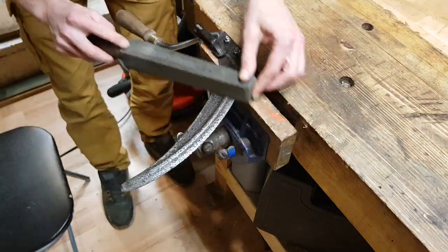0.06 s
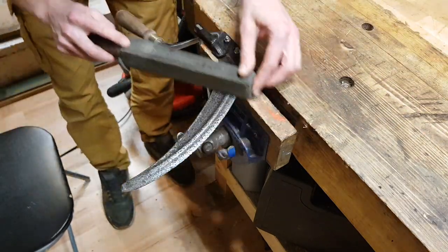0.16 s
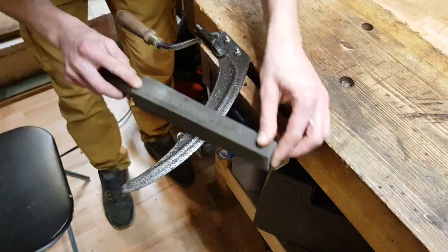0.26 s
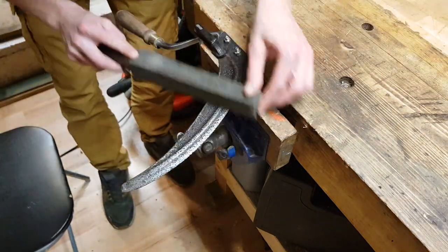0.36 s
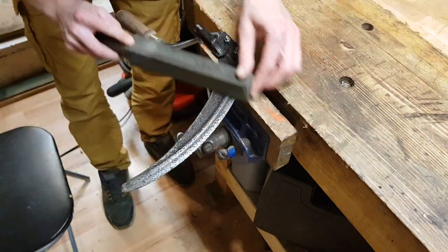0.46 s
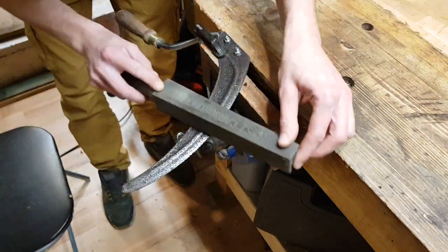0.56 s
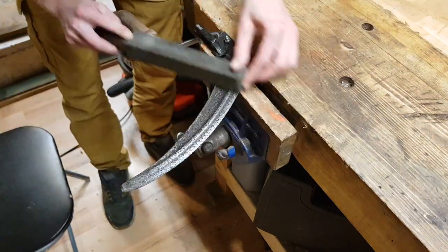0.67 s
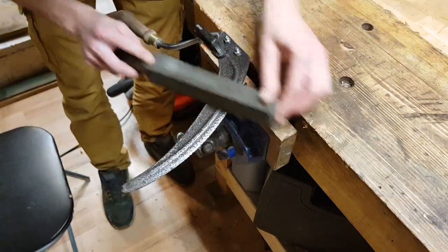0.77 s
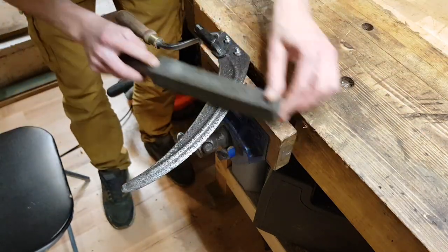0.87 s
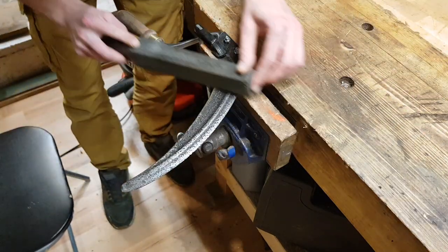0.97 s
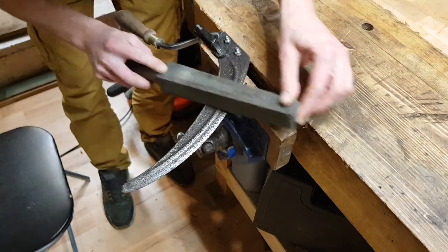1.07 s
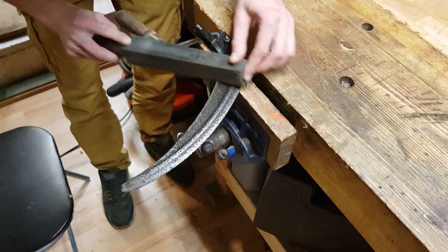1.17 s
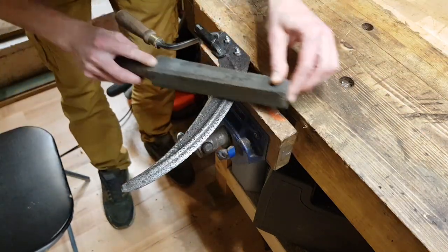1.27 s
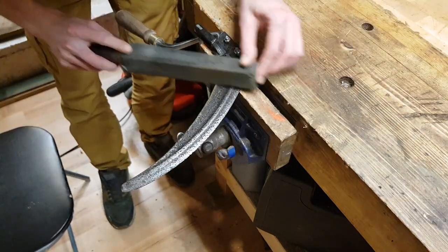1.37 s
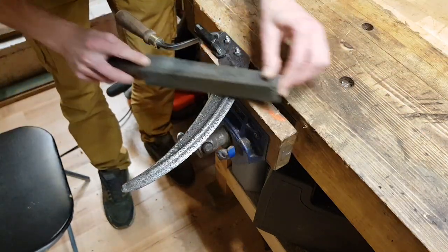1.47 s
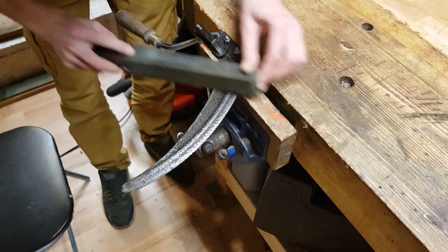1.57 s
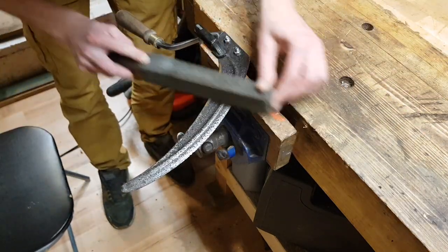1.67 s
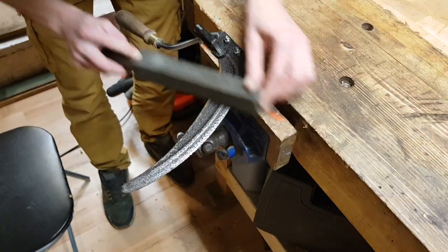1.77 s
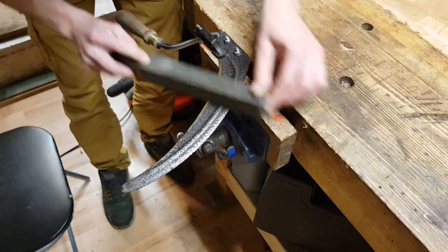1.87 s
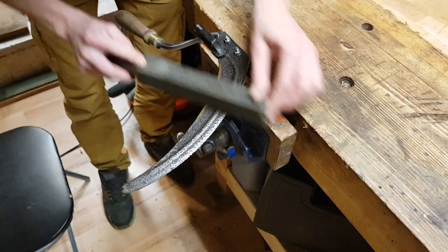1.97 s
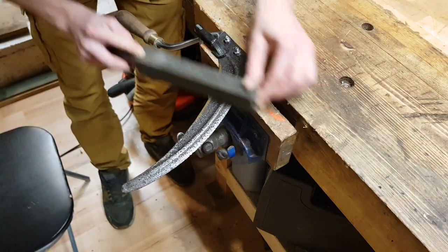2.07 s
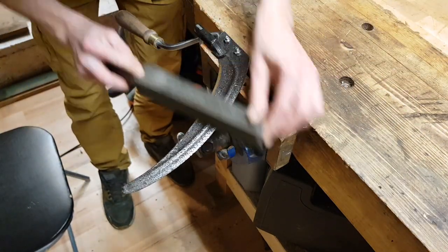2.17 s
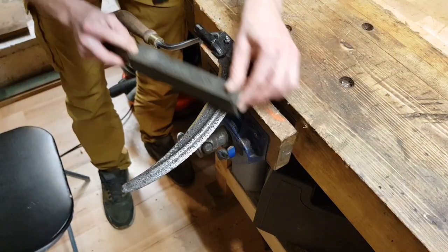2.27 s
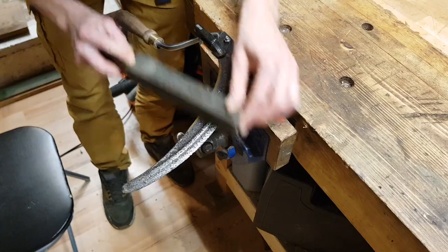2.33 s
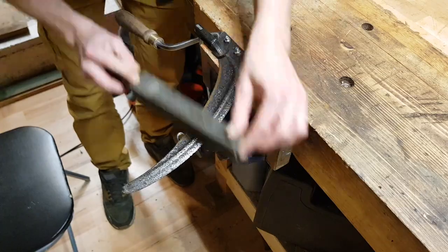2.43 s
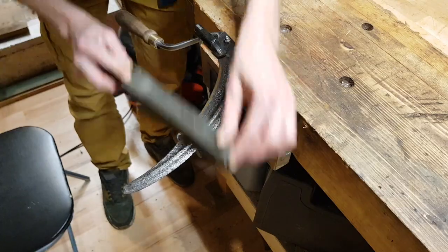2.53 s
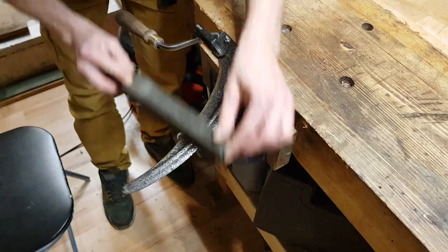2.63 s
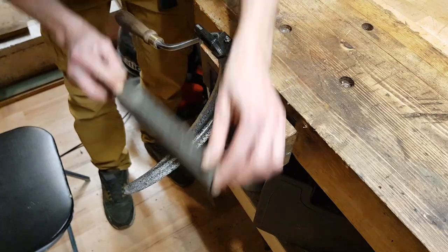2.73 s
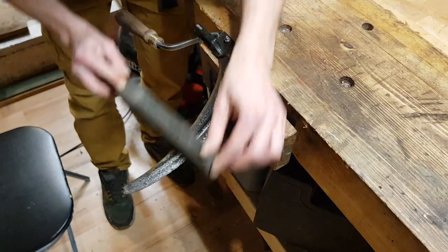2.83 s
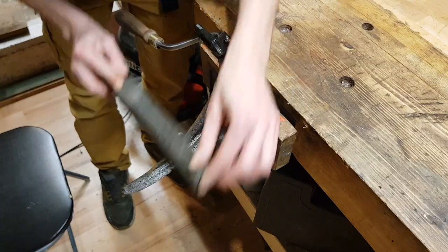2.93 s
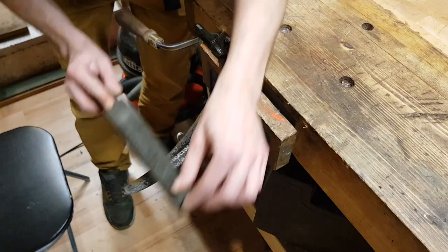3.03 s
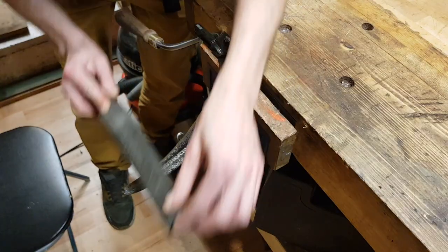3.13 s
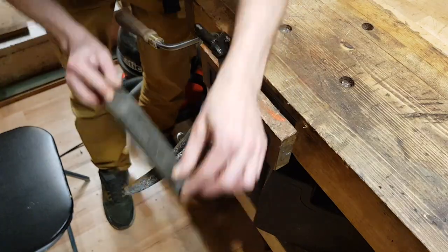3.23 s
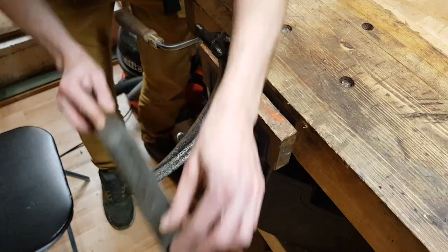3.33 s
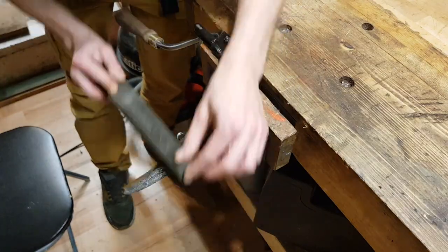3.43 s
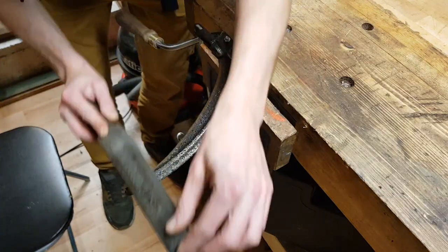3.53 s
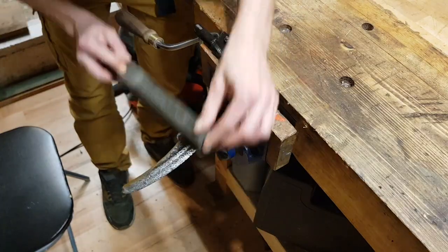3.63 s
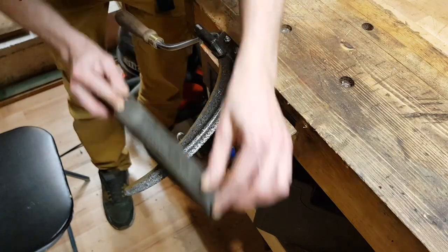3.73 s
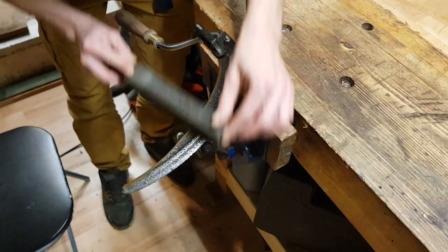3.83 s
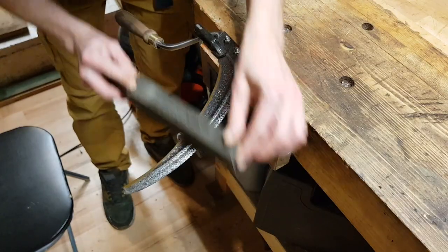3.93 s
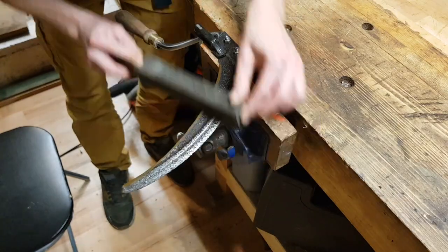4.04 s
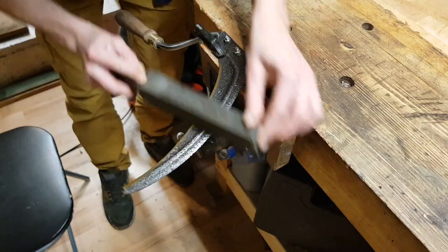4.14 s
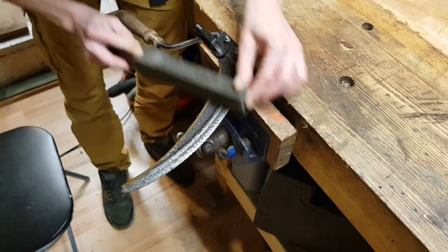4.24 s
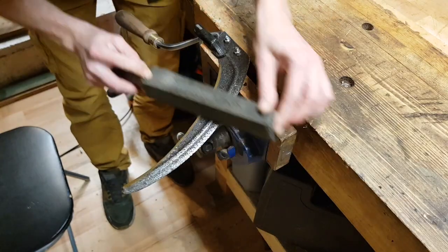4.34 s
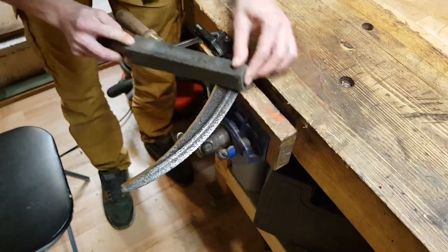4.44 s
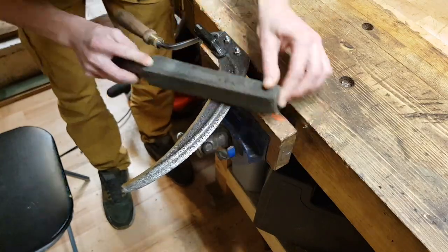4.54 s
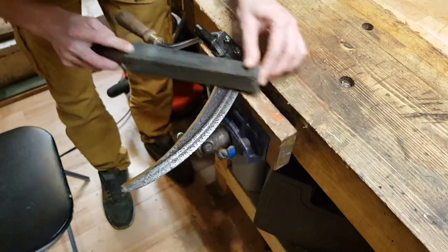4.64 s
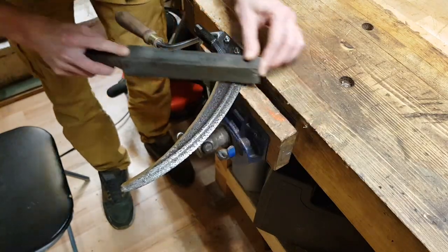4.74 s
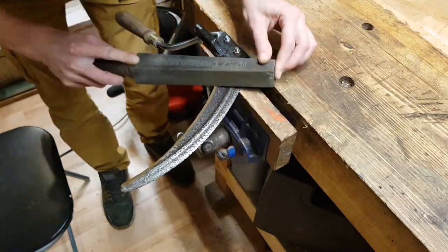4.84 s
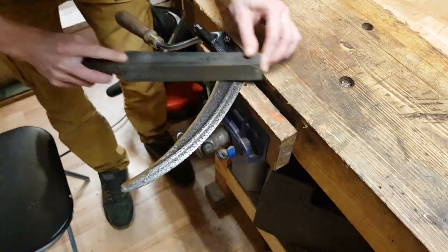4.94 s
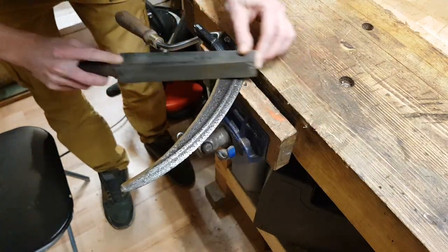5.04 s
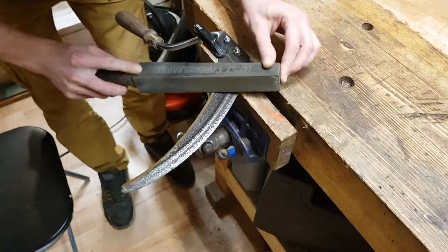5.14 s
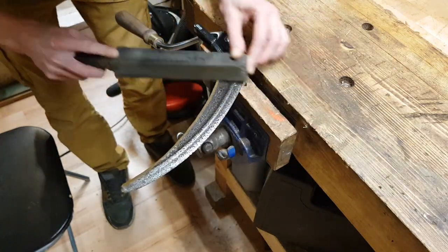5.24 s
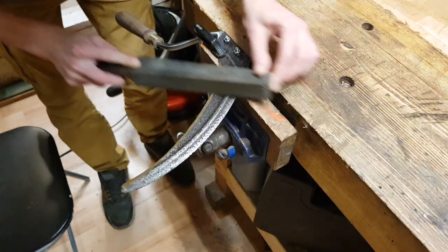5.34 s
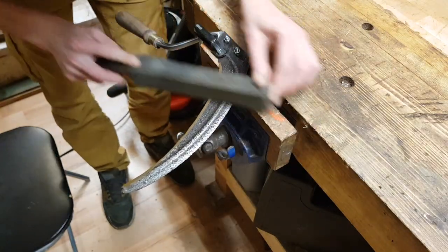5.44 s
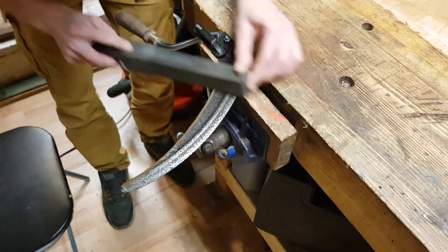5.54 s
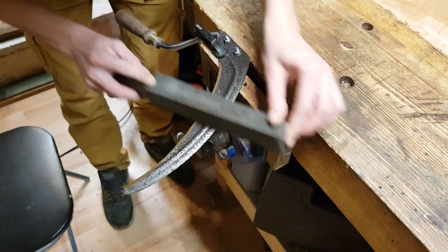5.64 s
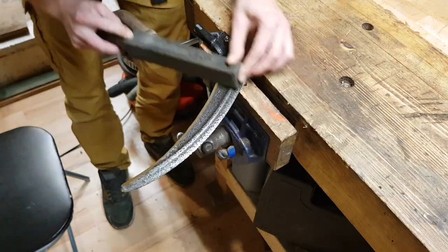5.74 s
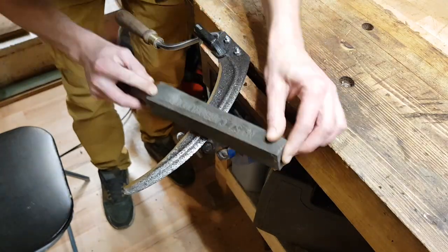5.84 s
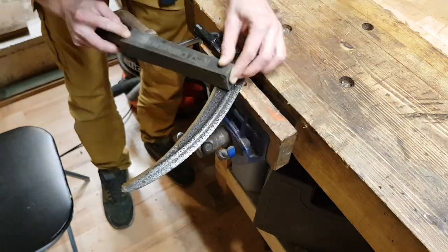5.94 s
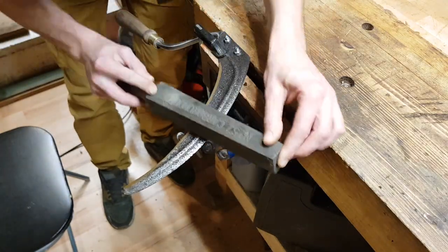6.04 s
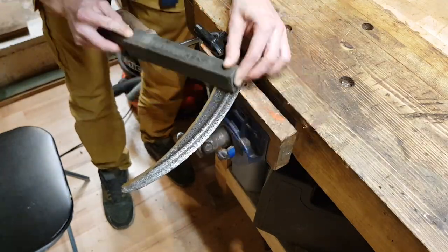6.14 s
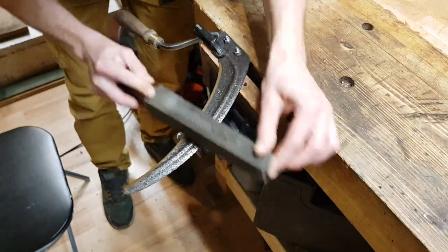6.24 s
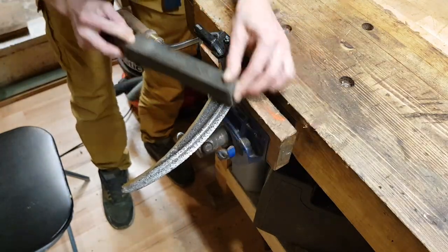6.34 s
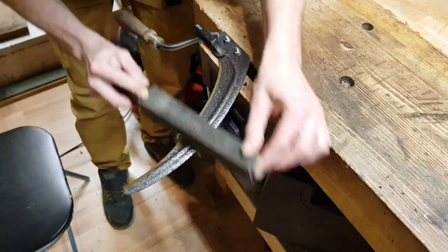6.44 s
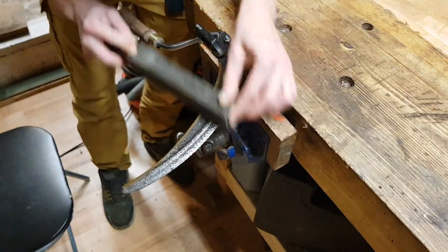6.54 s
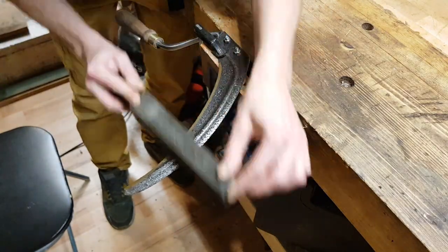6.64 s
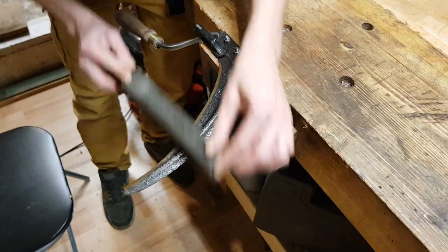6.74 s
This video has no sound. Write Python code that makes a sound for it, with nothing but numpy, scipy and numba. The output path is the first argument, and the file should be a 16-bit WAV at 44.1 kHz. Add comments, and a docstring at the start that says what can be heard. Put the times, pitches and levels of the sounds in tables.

```python
"""Sharpening stone on a curved blade

A long stone rubs to and fro, ten strokes a second, on a curved steel blade clamped to a wooden bench.
Breaking grit is noise grains shaped into a bright rasp that stops at every turn; the same kind of grains
drive fixed blade modes, modes that glide as the contact travels, and bench modes underneath.
Touches, bumps, a small workshop's response and faint room noise complete it."""
import sys
import numpy as np
from scipy import signal
from scipy.fft import rfft, irfft, next_fast_len
from scipy.io import wavfile
from numba import njit

SR = 44100
rng = np.random.default_rng(int(sys.argv[2]) if len(sys.argv) > 2 else 0)


def bounce(signal):
    """Save signal as a 16-bit WAV file at the path given by the first command-line argument."""
    frames = np.transpose(np.atleast_2d(signal))
    limited = np.clip(frames, -1, 1)
    pcm = np.round(limited * 32767).astype(np.int16)
    wavfile.write(sys.argv[1], SR, pcm)


N = 299880
TIME = np.arange(N) / SR

# Spectrum of grit on the edge. Each row: frequency in Hz, relative level in dB at the heel, at the belly.
RASP_SPECTRUM = [(404, -66, -40), (1570, -13.5, -52), (2880, -41.5, -13), (3940, -4, -6), (4570, -10, -2),
                 (5480, 5.5, -4.5), (5980, 2, -3), (7040, 6.5, 5.5), (7060, 2, 3.5), (8930, -2.5, -0.5),
                 (9800, 0, -1), (11830, -10.5, -10.5), (13700, -4.5, -6), (16000, -5, -5.5)]
# A push leans on the blade more than a pull: dB above the mean on a push, below it on a pull.
PUSH_BLADE_DB, PUSH_BENCH_DB = 1.5, 1.2


def undb(db):
    """Decibels to gain."""
    return 10 ** (np.asarray(db) / 20)


def unit(x):
    """Scale to rms 1."""
    return x / np.sqrt(np.mean(x ** 2))


def curve(points):
    """Control curve over TIME, joined by straight lines."""
    return np.interp(TIME, *np.transpose(points))


def walk(knots_per_s):
    """Random wandering between straight-line knots, spread near 1."""
    knots = rng.standard_normal(N // 10)
    return np.sqrt(3 / 2) * np.interp(TIME * knots_per_s, np.arange(len(knots)), knots)


def band(x, lo_hz, hi_hz):
    """Causal band-pass."""
    sos = signal.butter(2, [lo_hz, min(hi_hz, SR / 2 - 100)], "band", fs=SR, output="sos")
    return signal.sosfilt(sos, x)


def colour(x, hz, db):
    """Shape a sound by a spectrum interpolated over log frequency."""
    size = next_fast_len(N + SR // 10)
    bins_hz = np.maximum(np.fft.rfftfreq(size, 1 / SR), 1)
    gain = undb(np.interp(np.log(bins_hz), np.log(hz), db))
    return irfft(rfft(x, size) * gain, size)[:N]


def tail(t60_s, lo_hz, hi_hz):
    """Dense decaying noise response, half a second long, gain near 1 inside its band."""
    t = TIME[:SR // 2]
    response = rng.standard_normal(len(t)) * np.exp(-np.log(1000) * t / t60_s)
    return band(response / np.linalg.norm(response), lo_hz, hi_hz)


@njit
def resonance(x, hz, width_hz):
    """State-variable band-pass whose centre may move every sample."""
    y, band_state, low_state = np.empty(len(x)), 0., 0.
    for i in range(len(x)):
        g = np.tan(np.pi * min(hz[i], .45 * SR) / SR)
        damping = width_hz / hz[i]
        # the tiny offset keeps the states out of denormals
        v = (band_state + g * (x[i] + 1e-18 - low_state)) / (1 + g * (g + damping))
        band_state = 2 * v - band_state
        low_state = low_state + 2 * g * v
        y[i] = damping * v
    return y


def ring(x, modes, along):
    """Drive fixed modes, each as strongly as it moves under the stone; neighbours swing in opposite senses."""
    out = np.zeros(N)
    for k, (hz, width_hz, heel_db, belly_db) in enumerate(modes):
        drive = x * undb(heel_db + (belly_db - heel_db) * along)
        out += (-1) ** k * resonance(drive, np.full(N, float(hz)), float(width_hz))
    return out


def motion(fastest_share=.48, lopsided_share=.22, settle_s=1.7, scatter_share=.03, scatter_db=0.42):
    """Hand's swing: push +1 or pull -1, speed 0-1, place -1..1, stroke length in s, effort in dB."""
    # Even pace between these turns; a push and a pull are one stroke each. Each row: time in s, strokes done.
    pace = [(.179, 0), (.35, 1), (.754, 4), (.994, 6), (1.209, 8), (2.735, 24), (3.049, 27), (3.611, 33),
            (3.932, 36), (4.324, 40), (4.583, 43), (5.034, 49), (5.352, 53), (5.705, 57), (6.848, 69)]
    # The hand eases off for the short strokes at the heel. Each row: time in s, effort in dB before scatter.
    effort = [(.26, -8.5), (.69, -6), (1.15, -6.5), (1.42, -9), (1.73, -4.5), (2.45, -2.04), (3.33, -4.5),
              (3.6, -3.5), (4.08, .6), (4.45, -2.5), (4.68, -10.5), (4.83, -15), (5.0, -15), (5.25, -7.5),
              (5.52, -0.65), (6.8, -1.15)]
    times, done = np.transpose(pace)
    number = np.arange(int(done[-1]))
    turns = np.interp(np.arange(len(number) + 1), done, times)
    starts, lengths = turns[:-1], np.diff(turns)
    sense = (-1.) ** number
    timing, strength = rng.standard_normal((len(number), 2)).T
    # at first pushes peak early and pulls late, until the hand settles
    lopsided = sense * lopsided_share * np.exp(-(starts / settle_s) ** 2)
    fastest = fastest_share - lopsided + scatter_share * timing
    middles = starts + np.clip(fastest, .1, .9) * lengths
    marks = np.sort(np.concatenate([turns, middles]))
    phase = np.interp(TIME, marks, np.arange(len(marks)) / 2)
    velocity, place = np.sin(np.pi * phase), -np.cos(np.pi * phase)
    length_s = np.interp(TIME, middles, lengths)
    effort_db = curve(effort) + scatter_db * np.interp(TIME, middles, strength)
    return np.sign(velocity), np.abs(velocity), place, length_s, effort_db


def contact(place, length_s, effort_db, swing_per_s=2.7, doubling_db=8.1, heel_end=.22, belly_start=.68):
    """Contact on the blade: slow centre, swing about it, and heel-to-belly mix 0-1; effort widens the swing."""
    # From mid-blade to the heel, out to the belly, back to the heel, then out towards the belly.
    # Each row: time in s, place from heel 0 to belly 1.
    route = [(.5, .44), (1.0, .17), (1.4, .18), (1.8, .41), (2.2, .5), (3.0, 1), (3.7, .92), (4.0, .63),
             (4.35, .53), (4.8, .07), (5.2, .07), (5.5, .38), (6.1, .53), (6.8, .85)]
    centre = curve(route)
    swing = swing_per_s * length_s * 2 ** (effort_db / doubling_db) * place
    return centre, swing, np.interp(centre + swing, [heel_end, belly_start], [0, 1])


def grit(speed, grains_per_s=12000, spread_db=0.5, judder_db=1.0, patchy_db=1.95):
    """Tiny fractures of uneven size, denser at speed; the stone judders and has coarse and smooth patches."""
    chance = np.clip(grains_per_s / SR * (.25 + speed), 0, 1)
    sizes = undb(spread_db * rng.exponential(size=N)) * rng.standard_normal(N)
    # denser grains are scaled down, so density leaves the mean power alone
    grains = (rng.random(N) < chance) * sizes / np.sqrt(chance)
    return unit(grains * undb(judder_db * walk(450) + patchy_db * walk(70)))


def rasp(force, brightness, along, steel_db=-6, steel_t60_s=.022):
    """Bright scrape of the edge: its colour changes from heel to belly, and the steel smears it briefly."""
    hz, heel_db, belly_db = np.transpose(RASP_SPECTRUM)
    scrape = colour(force * (1 - along), hz, heel_db) + colour(force * along, hz, belly_db)
    treble = signal.sosfiltfilt(signal.butter(2, 8000, "high", fs=SR, output="sos"), scrape)
    below = scrape - treble
    scrape = below * undb(-.25 * brightness) + treble * undb(0.17 * brightness)
    smear = signal.fftconvolve(scrape, tail(steel_t60_s, 1100, 18600))[:N]
    return scrape + undb(steel_db) * smear


def clumps(x, depth_db=2.6, knots_per_s=55):
    """Coarse patches of the stone pass by, each changing the level of its own part of the scrape."""
    out, below = np.zeros(N), np.zeros(N)
    for hz in np.geomspace(2000, 16000, num=12):
        low = signal.sosfiltfilt(signal.butter(8, hz, fs=SR, output="sos"), x)
        out += (low - below) * undb(depth_db * np.clip(walk(knots_per_s), -1.5, 1.5))
        below = low
    return out


def blade_ring(push, speed, sense, along, gain_db=12, speed_power=0.65):
    """Sideways push of the grit bends the clamped blade and rings its fixed modes."""
    # Each row: frequency in Hz, width in Hz, drive in dB at the heel, drive in dB at the belly.
    blade_modes = [(1119, 53, 0.5, 2.5), (1186, 104, -2, -2.5), (1498, 58, -7, -5.5),
                   (1830, 57, -3.5, -2.5), (2024, 35, 4, -4.5), (2135, 62, -2.5, -4.5), (2327, 37.5, 3, 0),
                   (2610, 230, -7, -7), (3522, 44, 6, -3), (3913, 53, -13.5, -3), (4370, 88, 6, 1.5),
                   (5660, 46, -11, -11), (6190, 85, 3, -3), (10120, 300, 1.5, -3)]
    # Each row: time in s, drive level in dB before gain and push.
    blade_level = [(.2, -61.5), (1.1, -63), (2.05, -59.5), (2.4, -56.5), (3.5, -52), (4.15, -55.5),
                   (4.6, -60), (4.95, -61), (5.2, -58.5), (6.0, -56.5), (6.8, -56)]
    level_db = curve(blade_level) + PUSH_BLADE_DB * sense + gain_db
    return ring(push * speed ** speed_power * undb(level_db), blade_modes, along)


def gliding_modes(push, speed, sense, effort_db, centre, swing, heel_hz=900, belly_hz=2500):
    """The moving contact retunes the span, so its modes chirp up on one stroke and down on the next."""
    # Bending modes of the span between clamp and stone.
    # Each row: frequency ratio, share of the swing followed, width in Hz, relative level in dB.
    span_modes = [(1, 1, 35, -3.5), (2.12, .7, 40, -3), (3.0, .6, 70, 1), (4.15, .55, 110, 5),
                  (4.9, .5, 140, 5)]
    level_db = -60 + 1.4 * effort_db + PUSH_BLADE_DB * sense
    force = push * speed * undb(level_db)
    out = np.zeros(N)
    for ratio, share, width_hz, db in span_modes:
        hz = ratio * heel_hz * (belly_hz / heel_hz) ** (centre + share * swing)
        # evens out the noise power passed by different widths
        width_gain = np.sqrt(SR / (np.pi * width_hz))
        out += undb(db) * width_gain * resonance(force, hz, float(width_hz))
    return out


def bench_ring(push, speed, sense, place, along, gain_db=19, speed_power=0.36, lever_db=0.5):
    """Push through the clamp, and bumps, ring the bench; leverage adds force at the far end of each swing."""
    # Modes of bench and clamp. Each row: frequency in Hz, width in Hz, drive in dB at the heel, at the belly.
    bench_modes = [(158, 11, -11.5, -21), (258.7, 29, -14, -22.5), (347, 28, -9.5, -20),
                   (390.5, 15, -1, -5.5), (531.3, 25, 7, 3), (590, 56.5, -6, -2), (660.6, 46, -5, 0.5),
                   (818.4, 31.5, 0, -1), (967, 72, -2.5, -3.5)]
    # Each row: time in s, drive level in dB before gain, push and leverage.
    bench_level = [(.2, -73.5), (.95, -70), (1.3, -66), (1.6, -65.5), (1.85, -68.5), (3.0, -67),
                   (3.55, -63.5), (4.4, -67.5), (5.0, -65), (5.9, -66.5), (6.8, -65.5)]
    level_db = curve(bench_level) + PUSH_BENCH_DB * sense + lever_db * place
    drive = push * speed ** speed_power * undb(level_db) + bumps()
    return ring(drive * undb(gain_db), bench_modes, along)


def bumps(t60_s=0.058):
    """Stone bumps the blade and knocks the bench: noise bursts, each dying away quickly."""
    # Each row: start in s, level in dB before the bench gain.
    knocks = [(1.25, -64), (3.173, -57), (3.578, -51.5), (3.784, -49.5), (4.848, -73), (6.63, -57)]
    envelope = np.zeros(N)
    for s, db in knocks:
        age_s = np.maximum(TIME - s, 0)
        envelope += (TIME > s) * undb(db - 60 * age_s / t60_s)
    return envelope * rng.standard_normal(N)


def touches(knock_t60_s=0.24, grit_t60_s=0.097):
    """Stone touches down and catches: each touch knocks the blade and crushes a little grit."""
    # Each row: start in s, knock level in dB, grit level in dB.
    contacts = [(0.031, -70, -83), (0.088, -63, -63), (0.107, -69, -53), (0.133, -86, -51)]
    knock, crush = np.zeros(N), np.zeros(N)
    for s, knock_db, grit_db in contacts:
        age_s = np.maximum(TIME - s, 0)
        knock += (TIME > s) * undb(knock_db - 60 * age_s / knock_t60_s)
        crush += (TIME > s) * undb(grit_db - 60 * age_s / grit_t60_s)
    hz, heel_db, _ = np.transpose(RASP_SPECTRUM)
    knock_noise = unit(band(rng.standard_normal(N), 480, 3100))
    grit_noise = unit(colour(rng.standard_normal(N), hz, heel_db))
    return knock * knock_noise + crush * grit_noise


def workshop(x, low_db=-8, low_t60_s=.25, high_db=-24, high_t60_s=.35):
    """Small room: the middle range lingers, the treble is nearly dry."""
    middle, treble = tail(low_t60_s, 120, 2200), tail(high_t60_s, 2500, 16000)
    return x + signal.fftconvolve(x, undb(low_db) * middle + undb(high_db) * treble)[:N]


def hush(level_db=-90):
    """Still air of the room: steady coloured noise."""
    # Each row: frequency in Hz, relative level in dB.
    air_spectrum = [(25, -45), (55, -30), (110, -11.5), (160, -12), (230, -15), (500, -18.5), (1500, -29.5),
                    (16000, -26.5)]
    return undb(level_db) * unit(colour(rng.standard_normal(N), *np.transpose(air_spectrum)))


def scene(rasp_gain_db=-36, bite=1.334, rasp_power=1.82):
    """Breaking grit drives edge, blade and bench; the rasp depends most on speed."""
    sense, speed, place, length_s, effort_db = motion()
    centre, swing, along = contact(place, length_s, effort_db)
    # the scrape levels off once the stone bites
    cutting = grit(speed) * np.tanh(bite * speed ** rasp_power)
    brightness = 2.2 + 0.33 * effort_db
    edge = clumps(rasp(cutting * undb(effort_db + rasp_gain_db), brightness, along))
    # one sideways push bends the blade and passes through the clamp
    push = grit(speed)
    blade = blade_ring(push, speed, sense, along)
    chirps = gliding_modes(push, speed, sense, effort_db, centre, swing)
    bench = bench_ring(push, speed, sense, place, along)
    sources = edge + band(blade + chirps, 600, 16000) + band(bench, 140, 1600) + touches()
    return (workshop(sources) + hush())[None]


def record(dry, top_hz=15850):
    """Steep elliptic low-pass cuts the top."""
    return signal.sosfilt(signal.ellip(12, .2, 80, top_hz, fs=SR, output="sos"), dry)


dry = scene()
out = record(dry)
bounce(out)
```